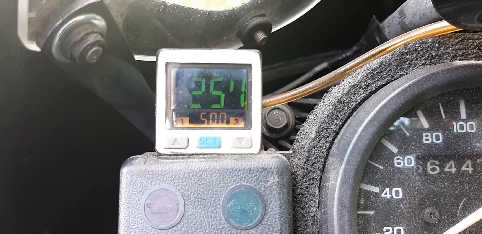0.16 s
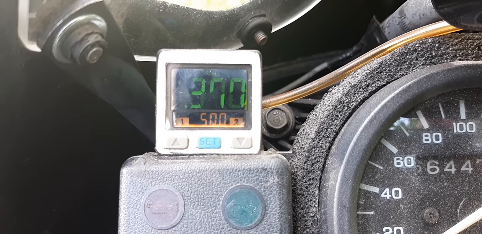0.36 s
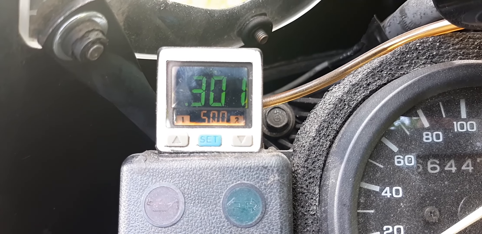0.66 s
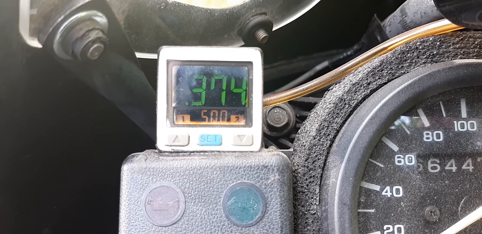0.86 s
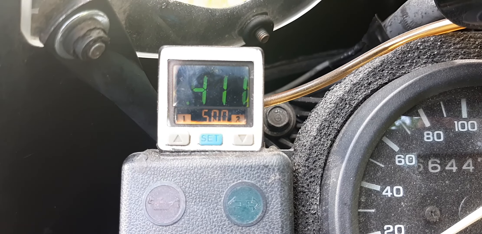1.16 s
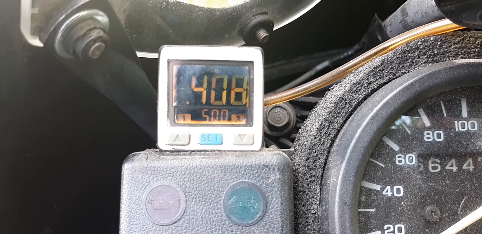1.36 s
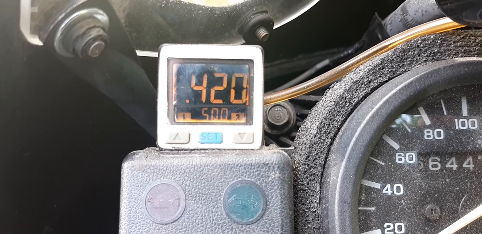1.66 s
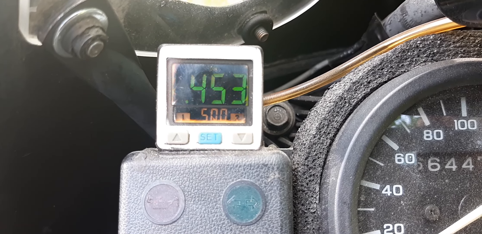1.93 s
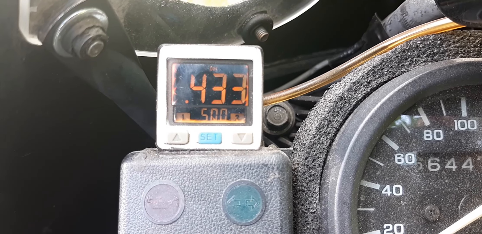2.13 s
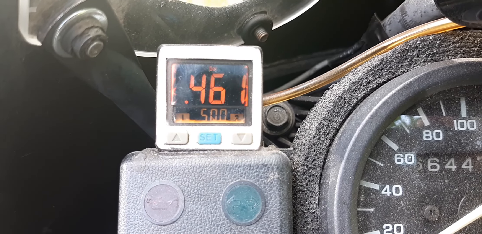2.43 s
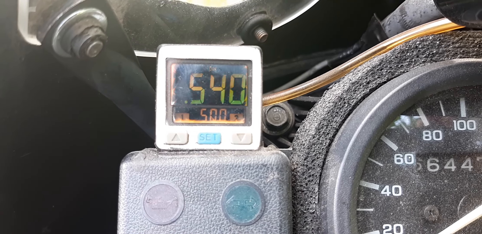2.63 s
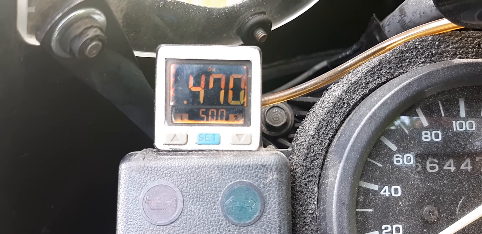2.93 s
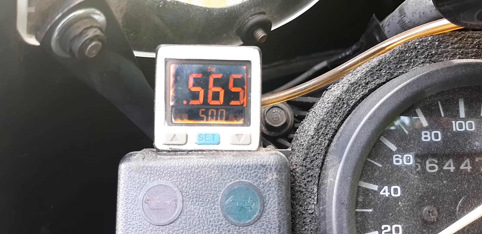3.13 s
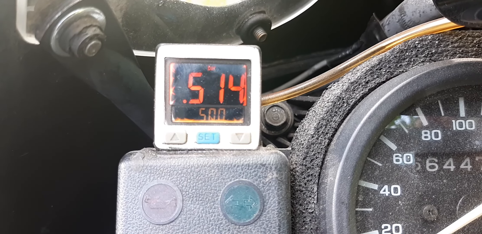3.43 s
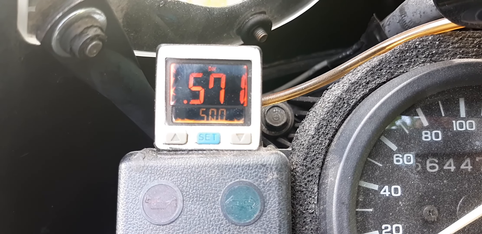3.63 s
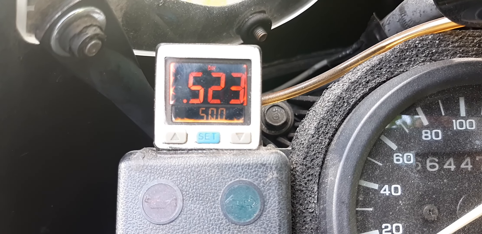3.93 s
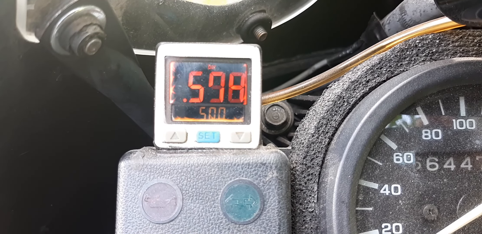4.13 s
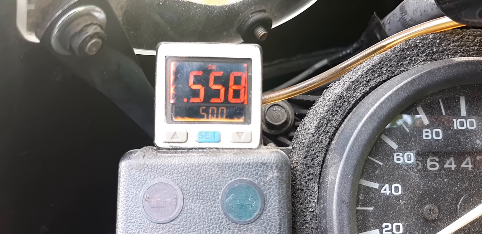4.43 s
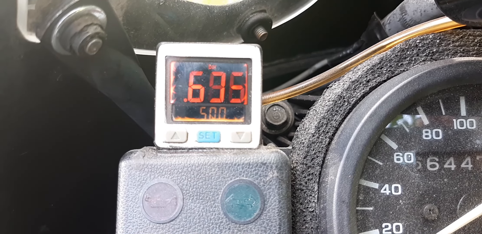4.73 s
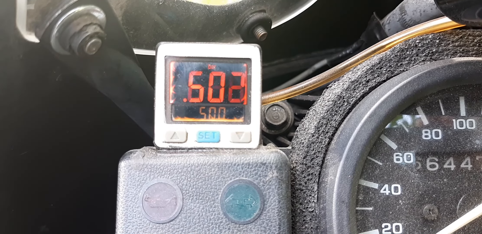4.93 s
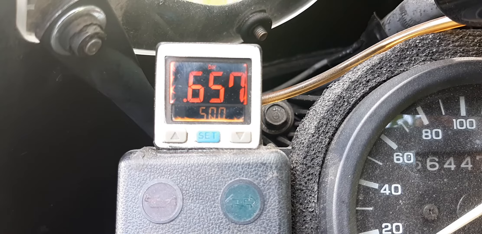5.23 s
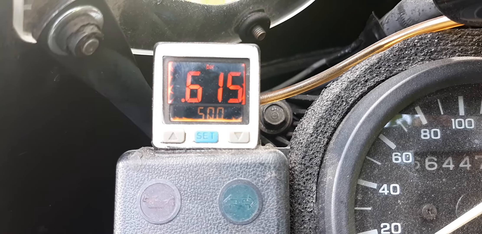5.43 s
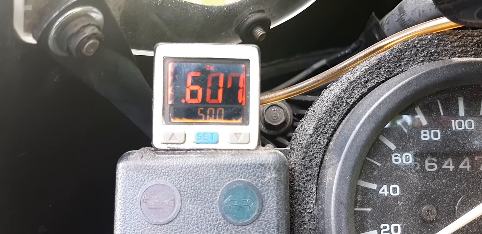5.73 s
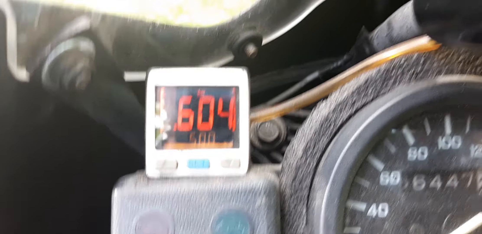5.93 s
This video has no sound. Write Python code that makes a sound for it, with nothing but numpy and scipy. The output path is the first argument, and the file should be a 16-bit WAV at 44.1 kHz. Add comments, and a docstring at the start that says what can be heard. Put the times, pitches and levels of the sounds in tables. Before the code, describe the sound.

A small electric air compressor runs very close to the microphone, a fast, hard, droning clatter with whining, grinding gears and hissing valve puffs. The hiss weakens and the tone shifts as pressure builds. A switch snaps, the pump winds down within a fraction of a second, and quiet outdoor air remains with tiny knocks and a faint raspy chirp.

```python
"""Small air compressor on a motorcycle

A small electric piston compressor pumps up a tank, about 33 strokes a second, with quiet open air behind. Each
stroke knocks, loads the whining, grinding gears and puffs air through a reed valve. The puffs weaken as
pressure builds, and the knocks change tone. The pressure switch snaps off; the crank coasts for two more
strokes and stalls as air leaks back through the valve. Small knocks and a faint, raspy, falling chirp follow."""
import sys
import numpy as np
from scipy import signal
from scipy.fft import rfft, irfft, next_fast_len
from scipy.io import wavfile

SR = 44100
rng = np.random.default_rng(int(sys.argv[2]) if len(sys.argv) > 2 else 0)


def dump(signal):
    """Clip the signal to [-1, 1] and save it as 16-bit WAV at the path in sys.argv[1]."""
    limited = np.clip(np.atleast_2d(signal).T, -1, 1)
    pcm = np.round(limited * 32767).astype(np.int16)
    wavfile.write(sys.argv[1], SR, pcm)


N = 268569
TIME = np.arange(N) / SR  # seconds

# crank speed under power: (time [s], speed [turns/s])
CRANK_SPEED = [(0, 32.919), (0.6, 32.901), (1.4, 32.75), (2.25, 32.832), (2.7, 33.091), (3.3, 33.18),
               (5.28, 33.743)]
FIRST_TURN = -.021  # crank position at the start, in turns
# the motor loses power, then drag and dry friction stop the crank
SWITCH_OFF_S, COAST_S, FRICTION_TURNS_PER_S2 = 5.288, .118, 46
# while coasting, the knock, the gear noise and the airflow fall as these powers of the speed
FORCE_EXPONENT, GEAR_EXPONENT, AIRFLOW_EXPONENT = 1, 1.24, 1.9
# the pump's tone changes over from light to heavy back pressure: midpoint and time scale
LOADED_AT_S, LOADING_S = 2.8, .33
# air through the valve dwindles as the tank fills
AIRFLOW_DB, AIRFLOW_LOSS_DB_PER_S = 2.5, 1.32

# spectrum of the open air: (frequency [Hz], relative level per Hz [dB])
OUTDOOR_SPECTRUM = [(30, -14), (160, 0), (450, -4), (750, -14), (1500, -18), (4500, -17), (7000, -21),
                    (8900, -23), (9600, -12), (11200, -12), (12200, -20), (16000, -23)]
# knock in the pump body, before its overall gain:
# (multiple of stroke rate [-], level at low pressure [dB], level at high pressure [dB])
KNOCK_HARMONICS = [(3, -66, -68.5), (4, -60.5, -52.5), (5, -50.5, -47.5), (6, -47.5, -44),
                   (7, -39.5, -50.5), (8, -39, -38.5), (9, -42.5, -52.5), (10, -49, -48.5),
                   (11, -55.5, -45.5), (12, -41, -42), (13, -48, -43), (14, -36.5, -36.5), (15, -43.5, -62),
                   (16, -42.5, -44.5), (17, -41, -44.5), (18, -39.5, -39.5), (19, -50, -53),
                   (20, -52, -54.5), (21, -54.5, -53), (22, -53, -51.5), (23, -62, -51), (24, -52.5, -48),
                   (25, -46, -40.5), (26, -65.5, -55.5), (27, -55.5, -51.5), (28, -65.5, -62.5),
                   (29, -58, -58), (30, -47, -52.5), (31, -46.5, -48.5), (32, -51.5, -61)]
# blows within one turn:
# (place [turn], relative level [dB], frequency it shakes most [Hz], push 1 or pull -1 [-])
BLOWS_PER_TURN = [(0, 5, 610, 1), (.08, -10.5, 232, -1), (0.151, -4.5, 430, 1), (.234, 1.5, 880, 1),
                  (0.562, -1.5, 408, 1), (.91, -1.5, 536, 1)]
# housing rings, each swelling where the gear teeth load it, before random unevenness:
# (frequency [Hz], loudest at [turn], spread [turns], level at low pressure [dB], at high pressure [dB])
HOUSING_RINGS = [(1887, 0.27, 0.062, -27, -27), (1886, 0.48, 0.093, -30, -30),
                 (1490.4, 0.45, 0.076, -30, -34), (1422, 0.86, 0.115, -33, -32),
                 (1500, .74, 0.083, -40.5, -34), (2126, 0.16, 0.081, -40, -35)]
# steady gear and motor tones, counts rounded when used:
# (cycles per turn [-], level at low pressure [dB], level at high pressure [dB])
GEAR_TONES = [(37, -51.5, -41.5), (43, -44, -51), (45, -44.5, -52.5), (136.9, -49.5, -49.5)]
# spectrum of the grinding tooth flaws: (frequency [Hz], relative level per Hz [dB])
GRIND_SPECTRUM = [(800, -17), (1080, -6), (1400, 5), (1700, -1.5), (2100, -7.5), (2450, -11.5), (3200, -11),
                  (4400, -7.5), (5500, -14), (7000, -27.5), (8000, -25.5), (11000, -21), (16000, -37)]
# spectrum of the loose gear train: (frequency [Hz], relative level per Hz [dB])
RATTLE_SPECTRUM = [(30, -12.5), (70, -10), (130, -15), (280, 1.5), (480, 4), (700, -0.5), (1100, 0),
                   (1430, -2), (1680, -6.5), (1900, -8), (2300, -6.5), (4500, -10.5), (8000, -21),
                   (16000, -29.5)]
# spectrum of rushing air: (frequency [Hz], relative level per Hz [dB])
PUFF_SPECTRUM = [(1500, -5.5), (2500, -2.5), (3300, -10.5), (4500, -0.5), (5300, 0.5), (6200, 2.5),
                 (7400, -13), (9200, -13.5), (10200, -12.5), (11500, -3), (12700, -16), (14000, -17.5),
                 (15600, -15)]
# valve resonances: (frequency [Hz], width [Hz], relative level [dB])
VALVE_RINGS = [(5270, 96, 4), (5880, 127, 3.5), (10140, 76, -4), (12150, 200, 2)]
# the switch, the piston rocking to rest, small knocks:
# (time [s], level [dB], time to fall 60 dB [s], upper frequency [Hz])
CLICK_EVENTS = [(5.2875, -31, .02, 6000), (5.2912, -25, .012, 14000), (5.2928, -15, .016, 14000),
                (5.375, -36, .07, 1900), (5.432, -44, .07, 600), (5.482, -47.5, .14, 550),
                (5.671, -63, .04, 2200), (5.764, -66, .04, 500), (5.957, -65, .04, 1500)]
# spectrum of the clicks before dulling: (frequency [Hz], relative level per Hz [dB])
CLICK_SPECTRUM = [(200, -3), (450, 5), (900, -12.5), (1400, 6.5), (2200, 0.5), (3400, -1), (5500, 1),
                  (8000, -11.5), (11500, -1.5), (16000, -12.5)]
# air slips back through the valve on the last slow strokes: (time [s], length [s], level [dB])
AIR_LEAKS = [(5.376, 0.017, -58), (5.452, 0.037, -53.5)]
LEAK_ATTACK_S, LEAK_T60_S = .005, 0.063  # t60 is the time to fall 60 dB
# syllables of the chirp: (time [s], level [dB], starting pitch [Hz], time to fall 60 dB [s])
CHIRP_SYLLABLES = [(5.615, -77, 4180, .25), (5.857, -62, 4540, .05), (5.870, -56, 3800, 0.046),
                   (5.917, -62, 3420, 0.083)]
CHIRP_ATTACK_S, CHIRP_FALL_OCTAVES_PER_S = 0.0054, 4.5
CHIRP_TAIL_DB, CHIRP_TAIL_T60_S = -7.5, 0.32
# the two microphone ports: (frequency [Hz], left minus right level [dB], left lead [rad])
MICROPHONE_PORTS = [(100, 0.5, 0.34), (250, -3, 0.2), (507, -4, 0), (1026, -0.5, 2), (1560, -4, 2),
                    (1867, -1.7, 0.95), (4000, -0.1, 2.04), (8000, -3.5, 1.3), (12000, -2.2, 1.86)]
CUTOFF_HZ = 16100


def from_db(db):
    """Turn decibels into gain."""
    return 10 ** (np.asarray(db) / 20)


def rms_one(x):
    """Scale to unit power."""
    return x / np.sqrt(np.mean(x ** 2) + 1e-20)


def in_time(rows):
    """Read each column of a curve at every sample."""
    s, *columns = np.transpose(rows)
    return [np.interp(TIME, s, c) for c in columns]


def colour(x, points):
    """Shape a signal with a spectrum and scale it to unit power."""
    hz, db = np.transpose(points)
    size = next_fast_len(N)
    f = np.maximum(np.fft.rfftfreq(size, 1 / SR), 1)
    gain = from_db(np.interp(np.log(f), np.log(hz), db))
    gain = gain * np.minimum(f / hz[0], 1) ** 2  # fade below the first point
    return rms_one(irfft(rfft(x, size) * gain, size)[..., :N])


def drift(rate):
    """Wander at random with unit power, drawing `rate` new points a second."""
    knots = rng.standard_normal(int(N / SR * rate) + 2)
    return rms_one(np.interp(TIME * rate, np.arange(len(knots)), knots))


def spread(pair, alike):
    """Mix two unrelated signals into a partly alike left and right."""
    alike = np.clip(alike, -1, 1)
    middle = np.sqrt(1 + alike) * pair[0]
    side = np.sqrt(1 - alike) * pair[1] * [[1], [-1]]
    return (middle + side) / np.sqrt(2)


def air(alike):
    """Make white stereo noise."""
    return spread(rng.standard_normal((2, N)), alike)


def resonate(x, hz, width):
    """Ring at one frequency, with a gain of about 1 at the peak."""
    r = np.exp(-np.pi * width / SR)
    top = np.array([1, 0, -1]) * (1 - r * r) / 2
    return signal.lfilter(top, [1, -2 * r * np.cos(2 * np.pi * hz / SR), r * r], x)


def swell(turn, centre, width):
    """Make a smooth bump once per turn."""
    distance = (turn - centre + .5) % 1 - .5
    return np.exp(-.5 * (distance / width) ** 2)


def envelope(start, attack, hold, t60):
    """Swell up to the start, hold, then die away."""
    early = np.maximum(start - TIME, 0)
    late = np.maximum(TIME - start - hold, 0)
    return np.exp(-early / attack) * from_db(-60 * late / t60)


def crank(powered):
    """Drag and friction leave the crank this share of its speed after the switch opens."""
    coasting = np.maximum(TIME - SWITCH_OFF_S, 0)
    friction = FRICTION_TURNS_PER_S2 * COAST_S / powered
    return np.maximum((1 + friction) * np.exp(-coasting / COAST_S) - friction, 0)


def working_cycle(turn, pace):
    """Gear load and valve follow each knock at their usual pace, even when the crank slows."""
    stroke = np.floor(turn)
    age = TIME - np.interp(stroke, turn, TIME)
    return stroke + np.clip(age * pace, 0, .999)


def outdoors(level_db=-70.5):
    """Quiet open air is steady shaped noise, partly alike in the two ears."""
    return from_db(level_db) * colour(air(alike=0.48), OUTDOOR_SPECTRUM)


def stroke_sound(levels_db, rate, octaves=0.67):
    """The blows of one stroke set its rhythm; the body sets the strength of each harmonic."""
    order = np.arange(len(levels_db))[:, None] + round(KNOCK_HARMONICS[0][0])
    rhythm = 0
    for at, db, hz, push in BLOWS_PER_TURN:
        octaves_away = np.log2(order * rate / hz)
        shake = np.exp(-.5 * (octaves_away / octaves) ** 2 - 2j * np.pi * order * at)
        rhythm = rhythm + np.sign(push) * from_db(db) * shake
    turn = np.arange(-SR // 20, SR // 20) / SR * rate
    fade = np.clip((.6 - abs(turn - .3)) / .2, 0, 1)
    # only the phase of the summed blows is used here, not their strength
    harmonics = np.cos(2 * np.pi * order * turn + np.angle(rhythm))
    return fade * np.sum(from_db(levels_db)[:, None] * harmonics, axis=0)


def knocks(turn, pressure, drive, level_db=1.5, uneven_db=0.0):
    """The piston shakes the body on every turn; the sound changes as pressure builds."""
    at = np.flatnonzero(np.diff(np.floor(turn)) > 0)
    force = drive[at] * from_db(level_db + uneven_db * rng.standard_normal(len(at)))
    _, low_db, high_db = np.transpose(KNOCK_HARMONICS)
    out = 0
    # stroke rates in Hz for low and high pressure
    for rate, db, share in ((32.85, low_db, 1 - pressure), (33.4, high_db, pressure)):
        blows = np.zeros(N)
        blows[at] = force * share[at]
        out = out + signal.fftconvolve(blows, stroke_sound(db, rate), "same")
    return out


def tap(turn, speed, drive, level_db=-30, width_s=.00007, low_hz=400):
    """The knock gets its hard edge as the play in the piston rod closes."""
    pulses = drive * swell(turn, 0, width_s * np.maximum(speed, 1))
    highpass = signal.butter(1, low_hz, "high", fs=SR, output="sos")
    return from_db(level_db) * signal.sosfilt(highpass, pulses)


def gear_whine(turn, cycle, pressure, drive, slack=0.95, uneven_db=1.67):
    """Loaded teeth ring the housing, while gears and motor hum whole cycles per turn."""
    rings, tones = 0, 0
    wander = .3 * drift(40) + .35 * drift(3)  # phase in radians
    for hz, centre, width, low_db, high_db in HOUSING_RINGS:
        since = TIME - np.interp(np.round(turn - centre), turn, TIME)  # seconds from the main blow
        level_db = low_db + (high_db - low_db) * pressure + uneven_db * drift(50)
        tone = np.sin(2 * np.pi * hz * since + wander)
        rings = rings + from_db(level_db) * swell(cycle, centre, width) * tone
    for count, low_db, high_db in GEAR_TONES:
        level_db = low_db + (high_db - low_db) * pressure
        tone = np.sin(2 * np.pi * round(count) * turn + slack * drift(10))
        tones = tones + drive * from_db(level_db) * tone
    return rings + tones


def tooth_grind(turn, level_db=-40.0):
    """Tooth flaws grind alike on every turn, replayed with a slight wobble."""
    flaws = irfft(np.exp(2j * np.pi * rng.random((2, 668))))
    place = np.linspace(0, 1, flaws.shape[1], endpoint=False)
    wobbling = turn + 0.00024 * drift(18)
    worn = np.array([np.interp(wobbling, place, f, period=1) for f in flaws])
    return from_db(level_db) * colour(spread(worn, alike=0.64), GRIND_SPECTRUM)


def gear_rattle(level_db=-41):
    """Play in the gear train rattles as shaped noise."""
    return from_db(level_db) * colour(air(alike=0.99), RATTLE_SPECTRUM)


def gears(turn, cycle, pressure, drive, load_depth=0.49):
    """The stroke loads the gears, so grind and rattle swell along with the whine."""
    load = 1 + load_depth * (2 * swell(cycle, 0.23, 0.4) - 1)
    noise = tooth_grind(turn) + gear_rattle()
    return drive * (gear_whine(turn, cycle, pressure, drive) + load * noise)


def valve(turn, airflow, puff_db=-33.5, ring_db=-35.5, squeak_db=-39, uneven_db=1.2,
          decay_turns=0.072, intake=0.098, squeak_hz=5200, glide_hz_per_turn=6500):
    """The reed opens just after the knock: a puff that rings in the valve and a short rising squeak."""
    stroke, phase = np.floor(turn).astype(int) + 1, turn % 1
    # two random numbers per stroke: puff strength and squeak pitch
    strength, tuning = rng.standard_normal((stroke.max() + 1, 2))[stroke].T
    opening = np.clip(phase / 0.036, 0, 1) * np.exp(-np.maximum(phase - .13, 0) / decay_turns)
    breath = opening + intake * swell(turn, 0.58, 0.078) + .15 * swell(turn, 0.99, 0.074)
    flow = airflow * from_db(uneven_db * strength) * breath
    jet = air(alike=0.9)
    puff = colour(jet, PUFF_SPECTRUM)
    ring = rms_one(sum(from_db(db) * resonate(jet, hz, width) for hz, width, db in VALVE_RINGS))
    pitch = squeak_hz + glide_hz_per_turn * phase + 280 * tuning + 200 * drift(900)
    squeak = swell(phase, 0.31, 0.063) * np.sin(2 * np.pi * np.cumsum(pitch) / SR)
    return flow * (from_db(puff_db) * puff + from_db(ring_db) * ring + from_db(squeak_db) * squeak)


def clicks():
    """Short noise cracks make the switch snap, the piston thuds and the small knocks."""
    crack, out = colour(air(alike=0.86), CLICK_SPECTRUM), 0
    for s, db, t60, bright_hz in CLICK_EVENTS:
        age = np.maximum(TIME - s, 0)
        lowpass = signal.butter(2, min(bright_hz, .45 * SR), fs=SR, output="sos")
        tone = rms_one(signal.sosfilt(lowpass, crack))
        out = out + tone * (TIME >= s) * from_db(db - np.minimum(60 * age / t60, 200))
    return out


def leak(whistle_hz=5330, width_hz=330, hiss_db=-1):
    """Trapped air whistles and hisses back out through the valve as the piston stalls."""
    jet = air(alike=0.82)
    whistle = resonate(resonate(jet, whistle_hz, width_hz), whistle_hz, width_hz)
    flow = 0
    for s, length, db in AIR_LEAKS:
        flow = flow + from_db(db) * envelope(s, LEAK_ATTACK_S, length, LEAK_T60_S)
    return flow * (rms_one(whistle) + from_db(hiss_db) * colour(jet, PUFF_SPECTRUM))


def chirp(rasp_hz=330, grit_db=1.0):
    """Each gritty syllable falls in pitch, dies quickly and leaves a weak tail."""
    rasp = np.array([np.cumsum(rasp_hz * drift(2300)) for ear in range(2)])
    grit, out = from_db(grit_db * drift(250)), 0
    for s, db, hz, t60 in CHIRP_SYLLABLES:
        pitch = hz * 2 ** (-CHIRP_FALL_OCTAVES_PER_S * np.clip(TIME - s, 0, t60))
        tail = from_db(CHIRP_TAIL_DB) * envelope(s, CHIRP_ATTACK_S, 0, CHIRP_TAIL_T60_S)
        level = envelope(s, CHIRP_ATTACK_S, 0, t60) + tail
        voice = rms_one(grit * np.sin(2 * np.pi * (np.cumsum(pitch) + rasp) / SR))
        out = out + from_db(db) * level * voice
    return out


def fairing(x, level_db=-9, low_hz=2400, count=8):
    """Nearby panels and dials scatter the treble, by other paths to each ear."""
    treble = signal.sosfilt(signal.butter(2, low_hz, "high", fs=SR, output="sos"), x)
    paths = rng.uniform(.0007, .006, (2, count))  # delays in seconds
    echoes = []
    for side, lags in zip(treble, paths):
        # every other echo is turned upside down
        copies = [(-1) ** k * np.interp(TIME - lag, TIME, side, left=0) for k, lag in enumerate(lags)]
        echoes.append(sum(copies))
    return x + from_db(level_db) * np.array(echoes) / np.sqrt(count)


def microphones(x):
    """The near sound reaches the two ports with unlike level and phase."""
    hz, pan_db, lead = np.transpose(MICROPHONE_PORTS)
    size = next_fast_len(N + SR)
    f = np.fft.rfftfreq(size, 1 / SR)
    # each side takes half of the difference
    half = from_db(np.interp(f, hz, pan_db) / 2) * np.exp(.5j * np.interp(f, hz, lead))
    return irfft(rfft(x, size) * np.array([half, 1 / half]), size)[:, :N]


def scene():
    """The crank drives every part of the pump; quiet open air lies behind."""
    powered, = in_time(CRANK_SPEED)
    kept = crank(powered)
    turn = FIRST_TURN + np.cumsum(powered * kept) / SR
    cycle = working_cycle(turn, powered)
    pressure = 1 / (1 + np.exp((LOADED_AT_S - TIME) / LOADING_S))  # 0 light, 1 heavy
    drive = kept ** FORCE_EXPONENT
    airflow = from_db(AIRFLOW_DB - AIRFLOW_LOSS_DB_PER_S * TIME) * kept ** AIRFLOW_EXPONENT
    piston = knocks(turn, pressure, drive) + tap(turn, powered * kept, drive)
    gear_noise = gears(turn, cycle, pressure, kept ** GEAR_EXPONENT)
    pump = piston + gear_noise + valve(cycle, airflow) + leak()
    return microphones(fairing(pump + clicks())) + chirp() + outdoors()


def record(dry):
    """A steep filter removes the very top of the treble."""
    return signal.sosfilt(signal.ellip(10, .2, 80, CUTOFF_HZ, fs=SR, output="sos"), dry)


dry = scene()
out = record(dry)
dump(out)
```